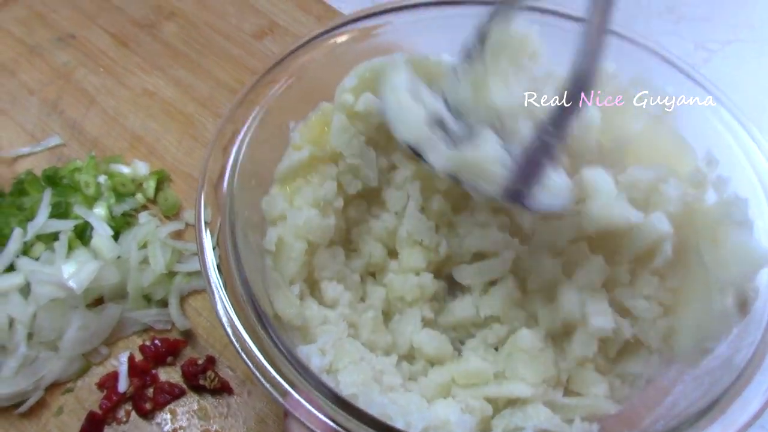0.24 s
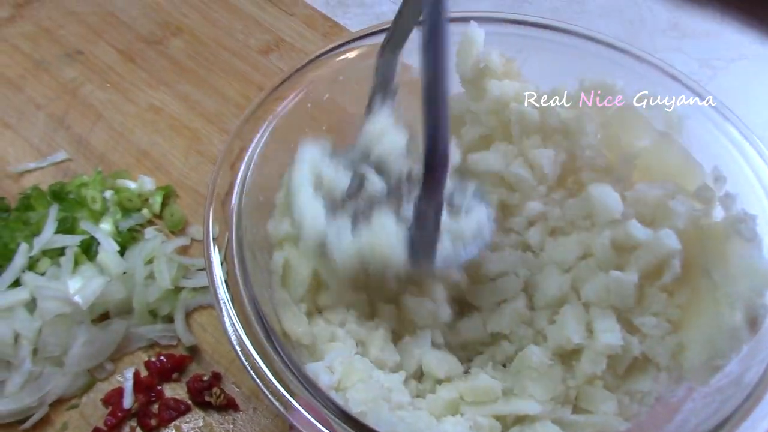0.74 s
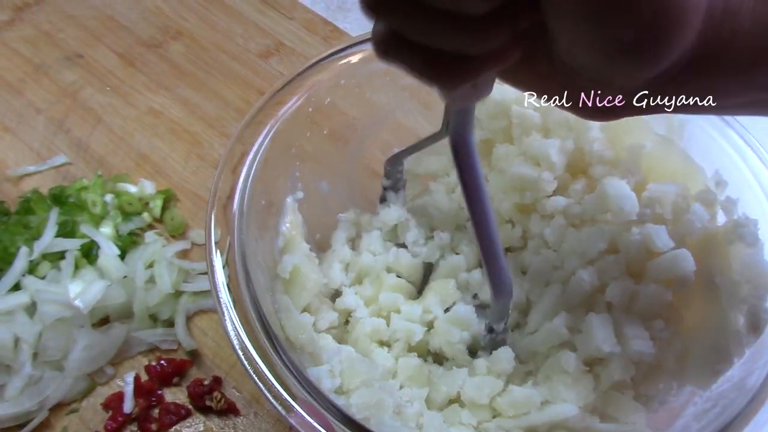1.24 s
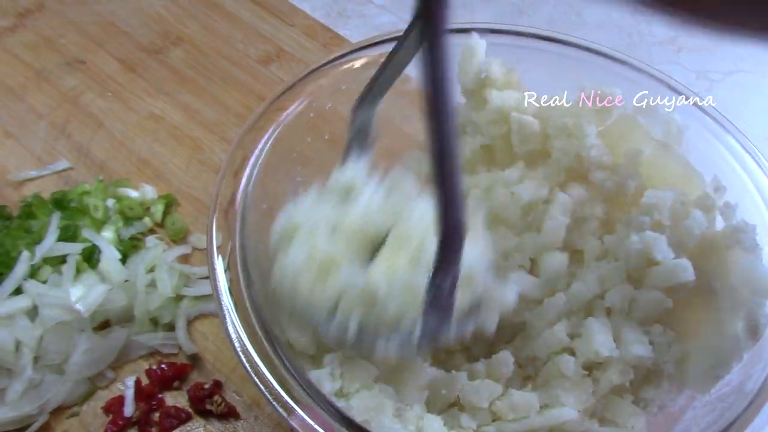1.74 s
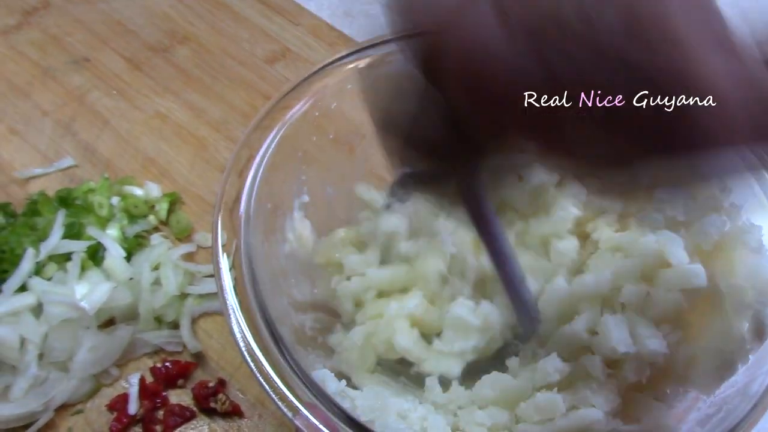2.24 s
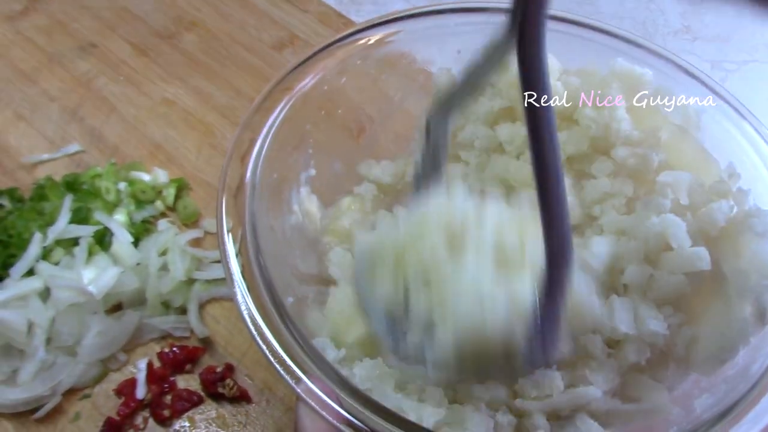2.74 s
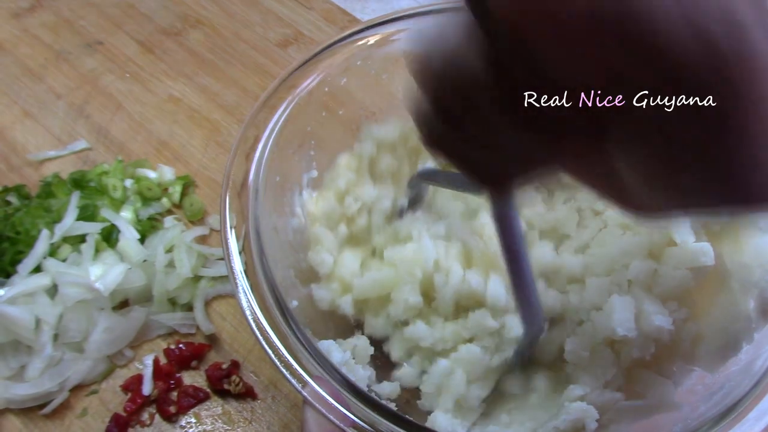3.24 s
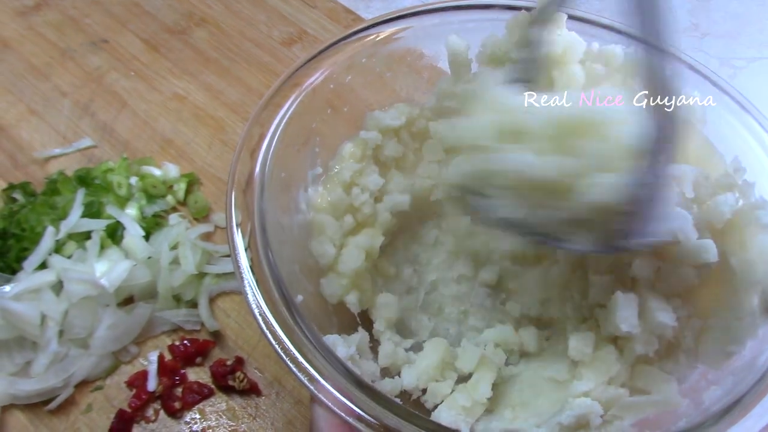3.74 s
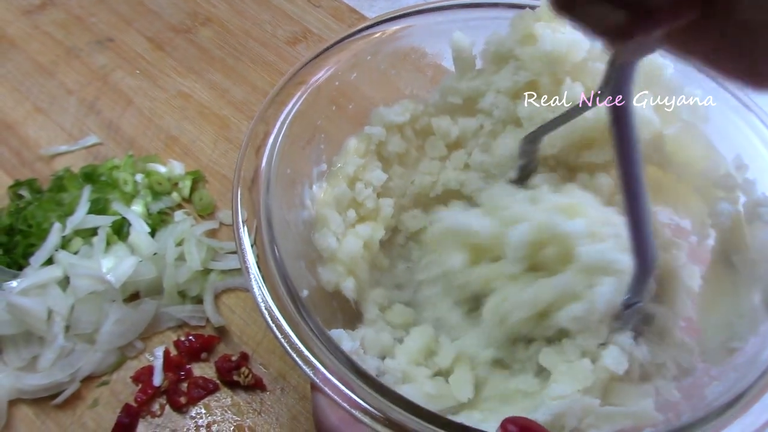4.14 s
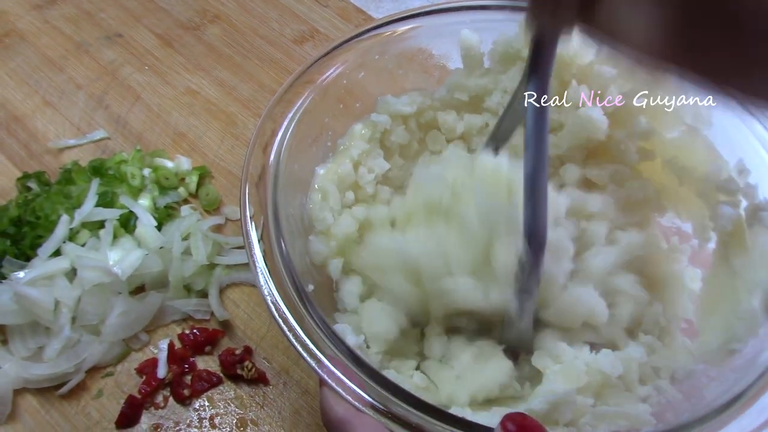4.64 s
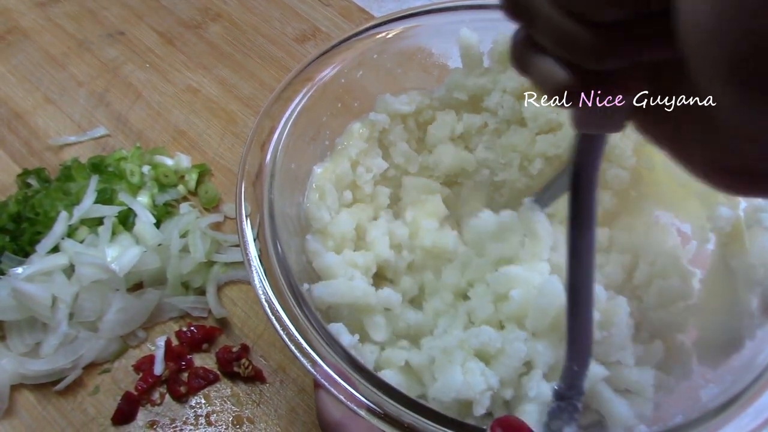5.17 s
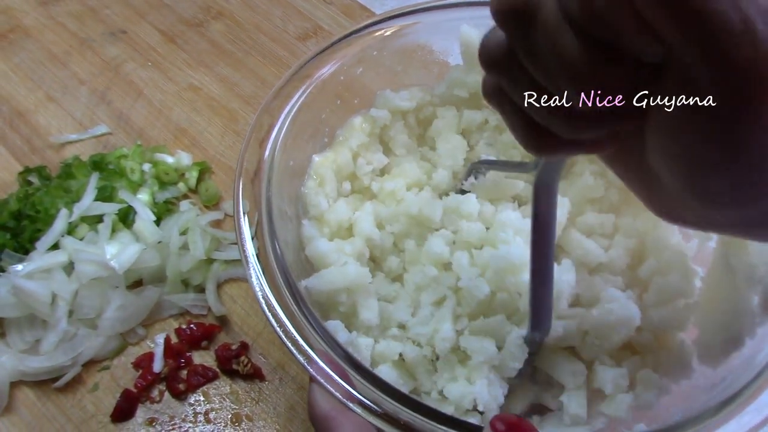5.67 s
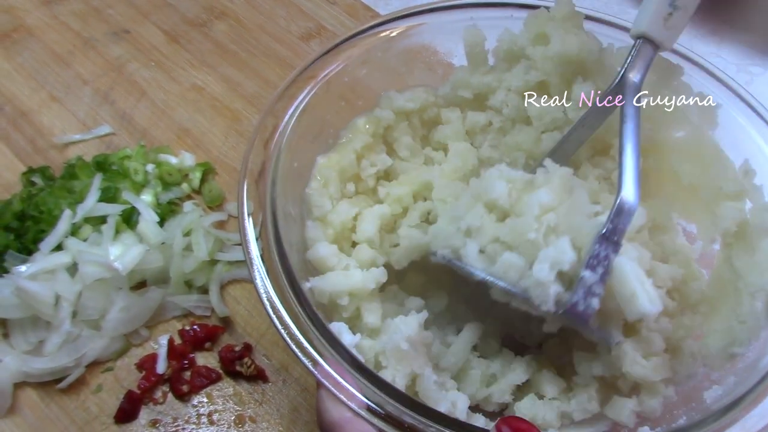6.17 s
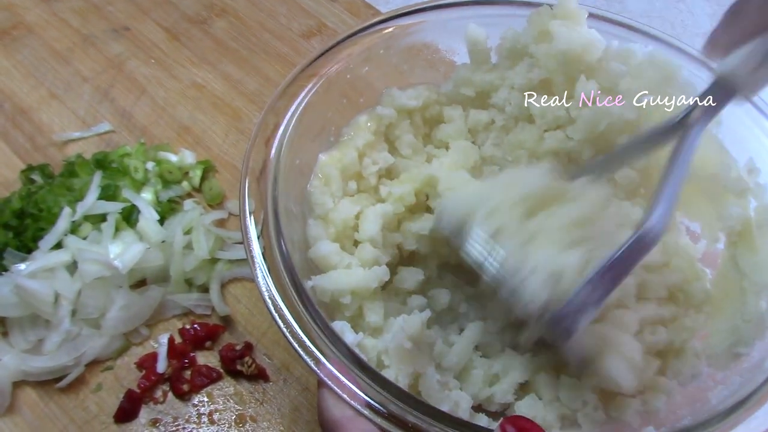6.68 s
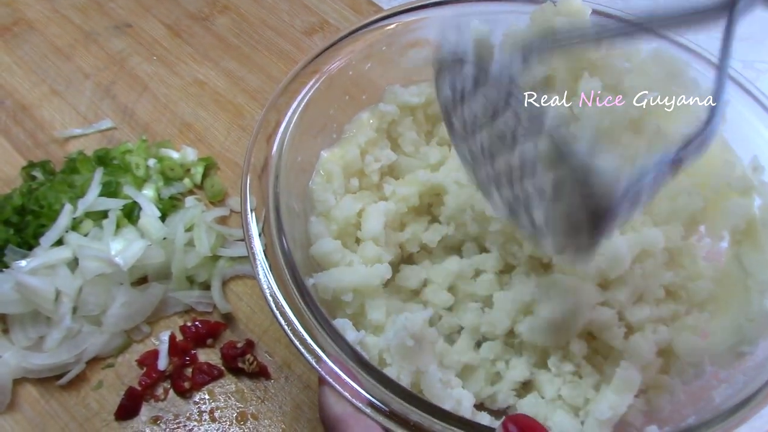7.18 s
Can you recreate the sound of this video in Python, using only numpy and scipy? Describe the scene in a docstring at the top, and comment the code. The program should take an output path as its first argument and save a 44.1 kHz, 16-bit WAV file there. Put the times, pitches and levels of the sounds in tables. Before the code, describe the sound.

A metal masher knocks sharply against a thick glass bowl, with dull wooden thuds and soft wet squelches of potato in a small room.

```python
"""Steel knocks on glass and rings a bowl, a wooden board thuds, moist potato squelches and ticks; a small kitchen hums.
A masher is pushed through boiled potato in the bowl. Knocks and ticks are band-passed noise bursts; glass and
board are sums of dying sines. Squelch, mush and rumble are filtered noise that follows the strokes, a rub is two
wavering sines, the room reply is dying noise and the hum is noise shaped band by band."""
import sys
import numpy as np
from scipy import signal
from scipy.fft import rfft, irfft
from scipy.io import wavfile

SR = 44100
rng = np.random.default_rng(int(sys.argv[2]) if len(sys.argv) > 2 else 0)


def to_wav(sig):
    """Store sig (one row per channel, or 1-D mono) as 16-bit WAV at the path in sys.argv[1].

    Samples outside -1..1 are clipped; the rate is SR.
    """
    pcm = np.clip(np.atleast_2d(sig), -1, 1) * 32767
    pcm = np.round(pcm).astype(np.int16)
    wavfile.write(sys.argv[1], SR, pcm.T)  # frames by channels


def volts(x):
    """Linear amplitude factor 10**(x/20) for a level x in dB, scalar or array-like."""
    e = np.asarray(x, float) / 20
    return 10 ** e


N = 326771
TIME = np.arange(N) / SR

# modes of the wooden board: pitch_hz, level_db (relative), t60_s
BOARD_MODES = [(117, -1.5, 0.15), (201.4, 1.5, 0.1), (235, -1, 0.18), (262.5, 3, 0.088),
               (351.8, 1.5, 0.067), (439, -8, 0.15)]


def rms_one(x):
    """Normalization: equal mean power, rms 1."""
    return x / np.sqrt(np.mean(x ** 2) + 1e-20)


def at_hz(points, hz):
    """Spectral interpolation: a curve read on a logarithmic frequency axis."""
    point_hz, value = np.array(points)[:, 0], np.array(points)[:, 1]
    return np.interp(np.log(hz), np.log(point_hz), value)


def band(x, low_hz, high_hz):
    """Band-pass filtering with Butterworth slopes."""
    sos = signal.butter(2, [low_hz, min(high_hz, .45 * SR)], "band", fs=SR, output="sos")
    return signal.sosfilt(sos, x)


def drift(knots_per_s):
    """Slow random modulation of spread about 1: straight lines between random knots."""
    knots = rng.standard_normal(400)
    return np.interp(TIME * knots_per_s % 399, np.arange(400), knots) * 1.2


def held(start_s, hold_s, rise_db_per_s, fall_db_per_s):
    """Exponential envelope, in dB below full: a rise to a hold, then a fall."""
    before_s = np.maximum(start_s - TIME, 0)
    after_s = np.maximum(TIME - start_s - hold_s, 0)
    return -rise_db_per_s * before_s - fall_db_per_s * after_s


def add(out, start_s, sound):
    """Superposition: mixes a short sound in at a time."""
    i = round(start_s * SR)
    out[i:i + len(sound)] += sound[:N - i]


def burst(noise, t60_s, low_hz, high_hz):
    """Impact transient: a click with a dying noise tail through a band, peak 1."""
    click_and_tail = np.append(3.0, noise[1:]) * volts(-60 * TIME[:len(noise)] / t60_s)
    x = band(click_and_tail, low_hz, high_hz)
    return x / np.abs(x).max()


def ring(force, hz, t60_s):
    """Damped resonator: a unit click sets a sine of height 1 ringing."""
    radius, turn = volts(-60 / (t60_s * SR)), 2 * np.pi * hz / SR
    return signal.lfilter([0, np.sin(turn)], [1, -2 * radius * np.cos(turn), radius * radius], force + 1e-18)


def struck(modes, gains_db, share):
    """Modal synthesis: dying sines from one blow; share scales every decay time."""
    t = TIME[:SR // 2, None]
    hz, db, t60_s = np.transpose(modes)
    decay = volts(db + gains_db - 60 * t / (t60_s * share))
    return np.sum(decay * np.sin(2 * np.pi * hz * t), axis=1)


def nearness(modes, hz, slope_db):
    """Selective excitation: a blow favours modes near one pitch, losing slope_db per octave away."""
    return -slope_db * np.abs(np.log2(np.array(modes)[:, 0] / hz))


def coloured(white, spectrum, patchy_db):
    """Subtractive synthesis: 0.4-octave noise bands, each with its level, flicker and stereo correlation."""
    # pitch_hz, left-right likeness (0 to 1)
    likeness = [(60, 0.93), (240, 0.64), (950, 0.62), (3770, 0.76), (15000, 1)]
    out, edges = 0, 28 * 2 ** np.arange(0, 9.6, .4)
    for k, (low, high) in enumerate(zip(edges, edges[1:])):
        hz = np.sqrt(low * high)
        if hz > spectrum[0][0]:
            mid, side = band(white[k % 2], low, high)
            alike = np.clip(at_hz(likeness, hz), 0, 1)
            gain = volts(at_hz(spectrum, hz) + patchy_db * drift(12.0))
            out = out + gain * (np.sqrt(1 + alike) * mid + np.sqrt(1 - alike) * side * [[1], [-1]])
    return rms_one(out)


def room_hum():
    """Stationary background noise: a steady hum with a shaped, slightly flickering spectrum."""
    # hum spectrum: pitch_hz, level_db (relative, per Hz)
    hum_spectrum = [(15, -54), (25, -21.5), (80, -18.5), (114, -4), (146, -8.5), (280, -3.5), (634, -8.5),
                    (687, -7.5), (766, -7.5), (1360, -19.5), (1470, -15.5), (3510, -22.5), (9080, -28),
                    (15200, -35.5), (16500, -49)]
    hum_rms_db = -56.5
    return volts(hum_rms_db) * coloured(rng.standard_normal((2, 2, N)), hum_spectrum, patchy_db=2.0)


def kitchen(x):
    """Diffuse reverberation: convolution with noise that dies band by band, alike left and right in the bass."""
    # reverberation bands: pitch_hz, t60_s, level_db (relative)
    room_bands = [(149.4, 0.22, 0), (343, 0.2, 0.5), (1142, 0.25, 0.5), (2660, 0.27, -1), (5816, 0.22, -3),
                  (13470, 0.11, 0)]
    t = TIME[:SR // 2]
    noise = rng.standard_normal((2, len(t)))
    tail = 0
    for hz, t60_s, db in room_bands:
        dying = volts(db - 60 * t / t60_s) / np.sqrt(t60_s * SR / 14)
        tail = tail + dying * band(noise, hz / 1.6, hz * 1.664)
    late = tail * (t > .002)
    mid, side = signal.fftconvolve(x[None], late, axes=1)[:, :N]
    return mid + volts(-11.5) * band(side, 1200, 13000) * [[1], [-1]]


def strokes():
    """Power addition: levels of squelch, mush and rumble; the hand surges in the first two."""
    # pushes and pulls through the potato: start_s, hold_s, squelch_db, mush_db, rumble_db (before surges)
    pushes = [(.68, 0.11, -57.5, -54, -60.5), (0.897, 0.061, -53.5, -58, -65),
              (1.074, 0.12, -56.5, -54.5, -59), (1.354, 0.16, -56, -58, -51.5),
              (2.002, 0.013, -60, -50.5, -51), (2.13, 0.023, -55.5, -54.5, -58),
              (2.292, 0.075, -49, -50, -50.5), (2.537, 0.058, -53, -54.5, -53.5),
              (3.061, 0.11, -60, -55, -54), (3.266, 0.068, -51, -48.5, -53.5),
              (3.538, 0.086, -52.5, -55.5, -64), (4.059, 0.076, -59, -58.5, -72),
              (4.21, 0.082, -55.5, -57.5, -75), (4.31, 0.063, -52, -47.5, -63),
              (4.593, 0.13, -58.5, -56, -55), (4.825, 0.057, -63, -73, -66), (5.232, 0.3, -63, -58, -65),
              (5.497, 0.16, -61, -56, -51), (5.845, 0.095, -58, -55.5, -63), (6.223, 0.14, -69, -65, -62),
              (6.63, 0.07, -69, -77, -62.5), (6.921, 0.037, -67.5, -67, -61.5)]
    rise_db_per_s, fall_db_per_s, surge_db = 249, 154, 1.5
    power = 0
    for start_s, hold_s, *levels_db in pushes:
        envelope_db = held(start_s, hold_s, rise_db_per_s, fall_db_per_s)
        power = power + volts(2 * np.array(levels_db)[:, None]) * volts(2 * envelope_db)
    return 10 * np.log10(power + 1e-18) + surge_db * drift(25.0) * np.array([[1], [1], [0]])


def rub():
    """Harmonic vibration: a brief low hum of two wavering partials, perhaps the bowl rubbing the board."""
    # start_s, hold_s, upper_partial_db, lower_partial_db (relative to the upper)
    rubs = [(1.64, 0.052, -48.5, -3.5), (3.706, 0.046, -58, -25), (3.908, 0.065, -56.5, -30)]
    lower_hz, edge_db_per_s = 216, 500
    phase = 2 * np.pi * np.cumsum(lower_hz * (1 + 0.0162 * drift(28.87))) / SR
    out = 0
    for start_s, hold_s, db, low_db in rubs:
        level = volts(db + held(start_s, hold_s, edge_db_per_s, edge_db_per_s))
        out = out + level * (volts(low_db) * np.sin(phase) + np.sin(2 * phase))
    return out


def board(force):
    """Modal resonance: a force drives the low modes of board and counter, of alternating sign."""
    return sum(volts(db) * (-1) ** k * ring(force, hz, t60_s) for k, (hz, db, t60_s) in enumerate(BOARD_MODES))


def thuds():
    """Force transmission: the push reaches the board through the bowl's foot, so it swells over a few ms."""
    # jolts of bowl on board: start_s, level_db (before mode gains), pitch_hz (favoured)
    jolts = [(0.514, -16, 248), (0.6, -33, 234), (1.206, -31.5, 188), (1.452, -32.5, 188),
             (1.893, -24, 183), (2.339, -13.5, 264), (2.408, -21.5, 129), (2.933, -20, 207),
             (3.361, -20, 275), (3.398, -31.5, 253), (3.43, -30, 238), (3.707, -45.5, 272),
             (4.384, -34, 114), (4.628, -41, 250), (5.08, -19.5, 248), (5.1, -16, 345), (5.464, -17.5, 242),
             (5.53, -28, 110), (5.666, -28, 116), (5.843, -40, 118), (6.152, -17.5, 234),
             (6.24, -34.5, 240)]
    spread_db, swell_s = 2.2, 0.0047
    out, uneven = np.zeros(N), rng.standard_normal((len(jolts), len(BOARD_MODES)))
    for (start_s, db, hz), chance in zip(jolts, uneven):
        gains_db = db - 4 + nearness(BOARD_MODES, hz, 5.9) + spread_db * chance
        thud = struck(BOARD_MODES, gains_db, 1)
        add(out, start_s, thud * (1 - np.exp(-TIME[:len(thud)] / swell_s)))
    return out


def grains(per_s, spread_db):
    """Granular noise: tiny films of moisture break at random, in clumps, with hiss between."""
    sizes = volts(spread_db * np.minimum(rng.exponential(1, N), 3.5)) * rng.choice([-1, 1], N)
    born = rng.random(N) < per_s * volts(5.0 * drift(40.0)) / SR
    return rms_one(sizes * born) + 0.42 * rng.standard_normal(N)


def potato(squelch_db, mush_db, rumble_db):
    """Filtered excitation: bright squelch, duller mush, and the push shaking the board."""
    # squelch spectrum: pitch_hz, level_db (relative, per Hz)
    squelch_spectrum = [(2350, -33), (4000, -3.5), (5100, -12), (6500, 1.5), (9340, -2.5), (15100, -15.5),
                        (16200, -20), (16500, -46)]
    hz = np.fft.rfftfreq(N, 1 / SR) + 1  # +1 keeps the logarithm finite
    squelch = irfft(rfft(grains(3800.0, 6.5)) * volts(at_hz(squelch_spectrum, hz)), N)
    mush = band(grains(1400.0, 1.4), 360, 3300)
    rumble = board(rng.standard_normal(N) * volts(2.2 * drift(30.0)))
    layers = [(squelch, squelch_db), (mush, mush_db), (rumble, rumble_db)]
    return sum(rms_one(x) * volts(db) for x, db in layers)


def ticks(squelch_db):
    """Adhesive release: wet snaps a millisecond or two long; small ones form a Poisson process."""
    # potato pulling off steel, the loudest snaps: start_s, peak_db, pitch_hz
    loud_ticks = [(0.9431, -30, 7700), (0.9532, -25, 7510), (1.0049, -29, 5870), (1.0653, -30, 9150),
                  (1.1293, -30, 7780), (1.2105, -33, 8030), (1.2487, -30.5, 7260), (1.275, -32.5, 6680),
                  (2.031, -34.5, 7600), (2.0841, -30, 7800), (2.2172, -30, 7390), (2.588, -28.5, 6000),
                  (3.254, -22.5, 9800), (3.5688, -26, 6740), (3.6069, -28, 7400), (3.6359, -25, 8130),
                  (3.683, -33, 6740), (3.7271, -37, 11000), (4.2392, -33, 8440), (4.595, -38.5, 6530),
                  (4.7299, -33.5, 8050), (5.3732, -48, 4050), (6.305, -39, 7800), (6.9385, -37, 9300)]
    small_per_s, small_hz = 58, 7500
    highest_above_squelch_db = 17.5
    gap, size, pitch = rng.random((400, 3)).T
    times = np.cumsum(-np.log(gap + 1e-9)) / small_per_s
    small_ticks = []
    for t, a, b in zip(times, size, pitch):
        if t < TIME[-1]:
            db = np.interp(t, TIME, squelch_db) + highest_above_squelch_db - 12.0 * a
            small_ticks.append((t, db, small_hz * 2 ** (0.66 * (b - .5))))
    out, noise = np.zeros(N), rng.standard_normal((len(loud_ticks) + len(times), 400))
    for (start_s, db, hz), a in zip(loud_ticks + small_ticks, noise):
        add(out, start_s, volts(db) * burst(a, 0.0014, hz / 1.9, hz * 1.8))
    return out


def bowl():
    """Mode splitting: blows on the bare wall ring families of modes, split by the uneven glass."""
    # start_s, level_db (before mode gains), brightness_db_per_octave, main_family_db (extra),
    # ring_share (of the free decay time)
    clinks = [(.511, -2.5, -2.5, 3, 0.77), (.6, -38, -1, 6, 0.71), (.79, -37.5, 5, -2, 1.1),
              (1.887, -10.5, 2, -1, 0.58), (2.001, -33.5, 11, -1, .27), (2.929, 1, 2, -6.5, 0.54),
              (5.073, -6.5, 7, 5, 0.29)]
    # families of bowl modes, each row: pitch_hz, level_db (relative), t60_s (free)
    families = [
        [(715.5, 0, 0.36), (720, -2.5, 0.15), (837, -5, 0.27)],
        [(1823, -3.5, 0.38), (1752, -10.5, 0.25), (1800, -4.5, 0.14), (1896, 0.5, 0.071)],
        [(3345, -11, 0.3), (3400, -21, 0.7), (3440, 1, 0.12), (3452, -14, 0.8), (3500, -20, 0.55),
         (3548, -1, .08), (3640, -7, .13)],
        [(4740, -15, .2), (4960, -14, .25), (5286, -6, .15), (5330, -3, .12), (5355, -13, 0.4),
         (5400, -15, .25)],
        [(7390, 9, 0.062), (7700, -16.5, 0.17), (7800, -8.5, 0.24), (9730, -6.5, 0.1), (9600, -9, .1)],
    ]
    # how well a blow wakes each family: level_db
    family_db = [-25.5, -16.5, -11, -21.5, -26]
    main_family, pivot_hz = 2, 2380  # brightness turns about the pivot
    out, modes = np.zeros(N), sum(families, [])
    family = np.repeat(np.arange(len(families)), [len(f) for f in families])
    octaves = np.log2(np.array(modes)[:, 0] / pivot_hz)
    uneven = rng.standard_normal((len(clinks), len(modes)))
    for (start_s, db, bright_db, main_db, share), chance in zip(clinks, uneven):
        gains_db = db + np.array(family_db)[family] + bright_db * octaves + main_db * (family == main_family)
        add(out, start_s, struck(modes, gains_db + 0.71 * chance, max(share, .05)))
    return out


def blows():
    """Damped impact: steel on loaded glass gives a bright snap, a dull knock and a short muffled ring."""
    # steel on glass: start_s, snap_db, snap_hz, knock_db, knock_hz (levels before the offsets below)
    hits = [(0.5104, -25, 8000, -3, 1800), (0.6, -45.5, 3860, -22, 1480), (1.1498, -23.5, 7500, -33, 2410),
            (1.1842, -33.5, 7600, -53, 2380), (1.4508, -42, 8470, -41.5, 1420),
            (1.888, -12, 7800, -11.5, 2220), (2.3018, -37.5, 3730, -37, 2770),
            (2.3352, -12, 7550, -11.5, 2190), (2.4102, -22, 3560, -20.5, 2540),
            (2.9297, -4, 5730, -12, 2052), (3.3197, -30, 6540, -32, 1820), (3.3521, -19.5, 7400, -18, 1860),
            (3.3585, -21.5, 7800, -26, 2600), (4.0579, -55.5, 6200, -48, 1440),
            (4.356, -36, 3670, -31.5, 2180), (4.3782, -26, 4450, -26, 1450), (4.3887, -36, 3620, -33, 2400),
            (4.4338, -39, 3900, -42, 2340), (5.0735, -12, 5660, -2.5, 1755),
            (5.465, -31, 3850, -17.5, 2240), (5.5278, -34, 4250, -26, 1220),
            (5.6694, -53, 4250, -36.5, 1300), (6.1541, -19.5, 6520, -15.5, 1926),
            (6.152, -19, 4140, -44, 4050), (6.24, -56, 4830, -38, 934)]
    # masher and potato-damped bowl, knocked together: pitch_hz, level_db (relative), t60_s (before the share)
    muffled = [(571.3, -13.5, 0.16), (770, 12, 0.04), (990, 3, .04), (1105, -2, .05), (1371, -1.5, 0.071),
               (1434, -2.5, 0.11), (1595, -6, 0.066), (2038, 3, 0.042), (2233, 1, 0.031), (2452, -4, 0.071),
               (2533, -0.5, 0.028), (3030, -11.5, 0.024), (3815, 2, 0.065), (3930, -3.5, 0.11),
               (4690, -2.5, .05), (6200, -3.5, 0.034), (6700, -7.5, 0.058)]
    muffled_db, muffled_share = -7, .42
    out, noise = np.zeros(N), rng.standard_normal((len(hits), 2, 1500))
    for (start_s, snap_db, snap_hz, knock_db, hz), (a, b) in zip(hits, noise):
        add(out, start_s, volts(snap_db - 3.5) * burst(a, 0.021, 4000, 9000))
        add(out, start_s, volts(snap_db - 2) * burst(a[::-1], 0.013, snap_hz / 1.3, snap_hz * 1.12))
        add(out, start_s, volts(knock_db - 0.5) * burst(b, 0.013, hz / 1.3, hz * 1.364))
        # each mode answers to whichever of knock and snap wakes it more
        by_knock_db = nearness(muffled, hz, 13.1)
        by_snap_db = snap_db - knock_db + nearness(muffled, snap_hz, 32.0)
        uneven_db = 0.57 * a[-len(muffled):]
        gains_db = knock_db + muffled_db + np.maximum(by_knock_db, by_snap_db) + uneven_db
        add(out, start_s, struck(muffled, gains_db, muffled_share))
    return out


def scene():
    """Direct and reverberant sound: the soft potato is too close and quiet to wake the room."""
    levels_db = strokes()
    hard = band(blows() + bowl(), 560, 19000) + thuds() + ticks(levels_db[0])
    soft = potato(*levels_db) + rub()
    hum = room_hum()
    near = hard + kitchen(hard) + soft
    return band(band(near, 100, 19000), 50, 19000) + hum


def band_limit(x):
    """A steep low-pass at the top of the band."""
    return signal.sosfilt(signal.butter(12, 16840, fs=SR, output="sos"), x)


def record(dry):
    """Soft saturation and band limiting: peaks are rounded, then the top is cut."""
    rounded = dry / (1 + (dry / .95) ** 8) ** .125
    low_pass = signal.cheby2(12, 70, 16600, fs=SR, output="sos")  # order, stopband dB, stopband edge Hz
    mix = signal.sosfilt(low_pass, band(rounded, 40, 19000))
    return band_limit(mix)


dry = scene()
out = record(dry)
to_wav(out)
```